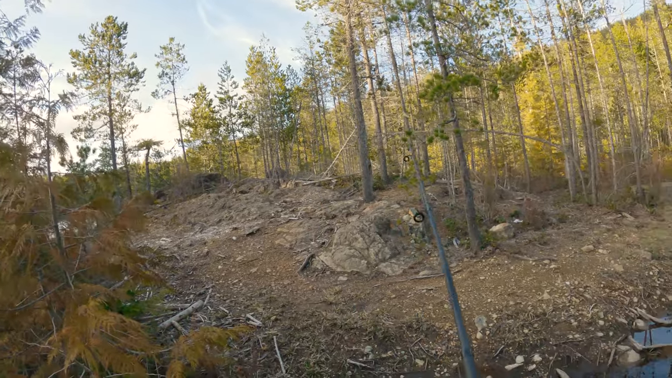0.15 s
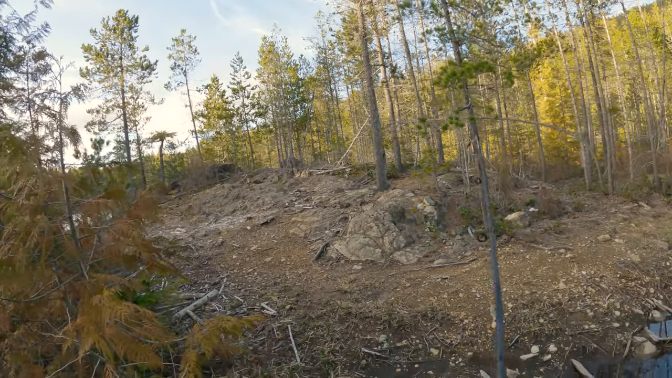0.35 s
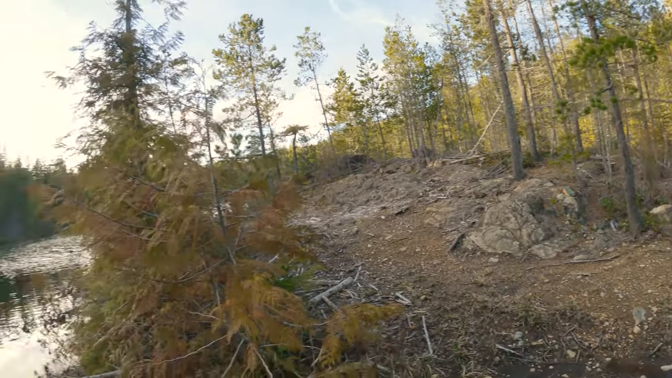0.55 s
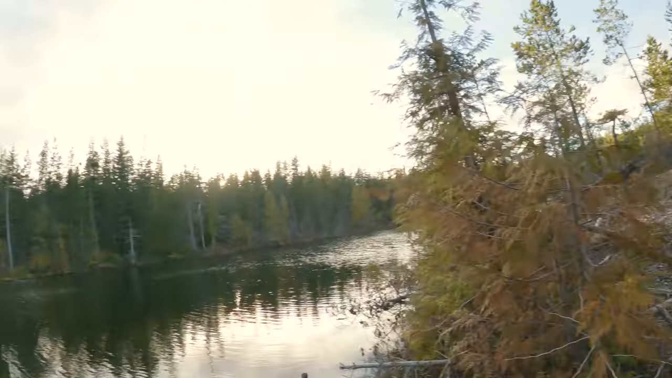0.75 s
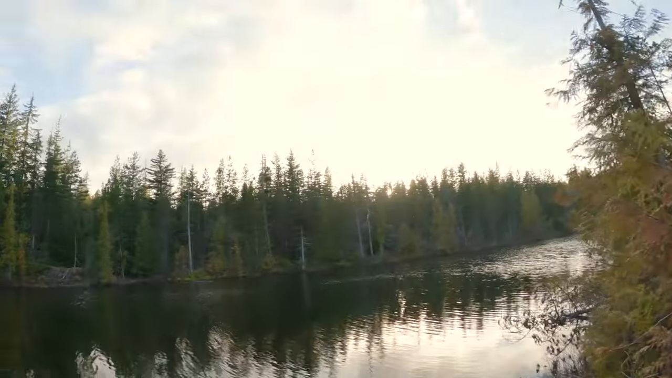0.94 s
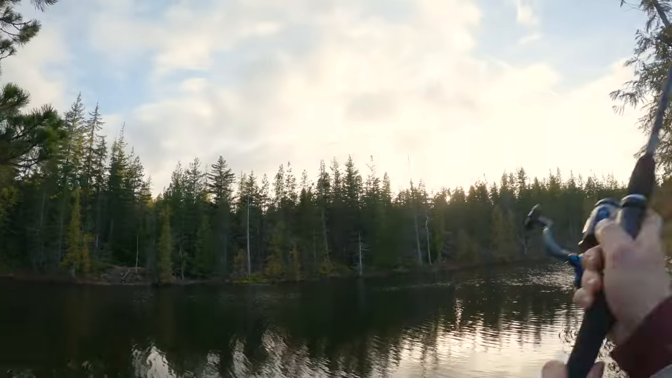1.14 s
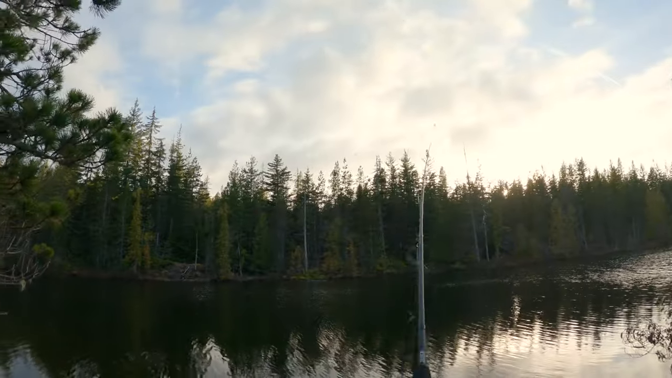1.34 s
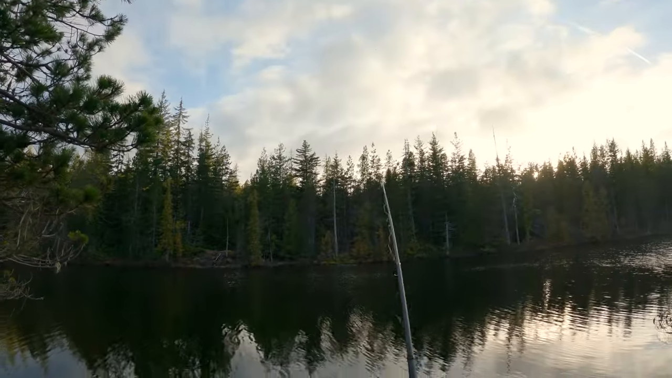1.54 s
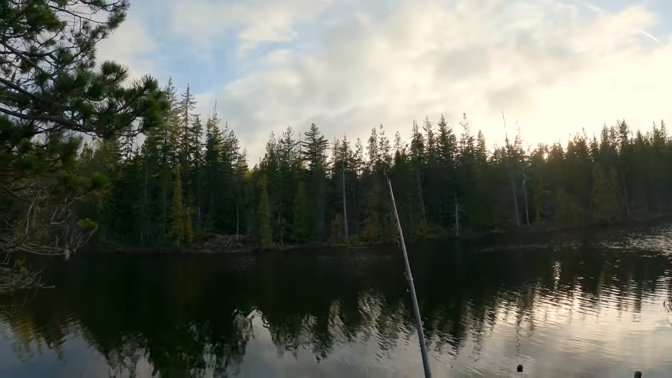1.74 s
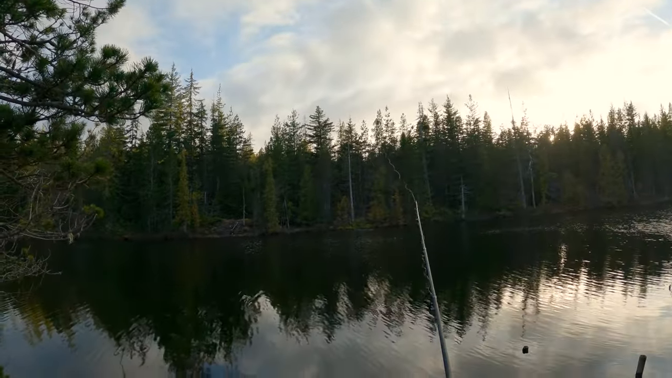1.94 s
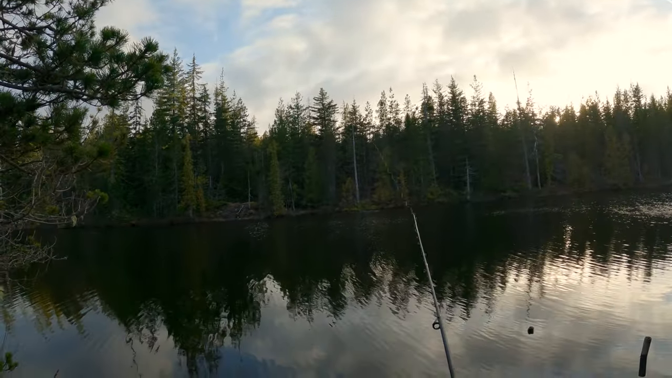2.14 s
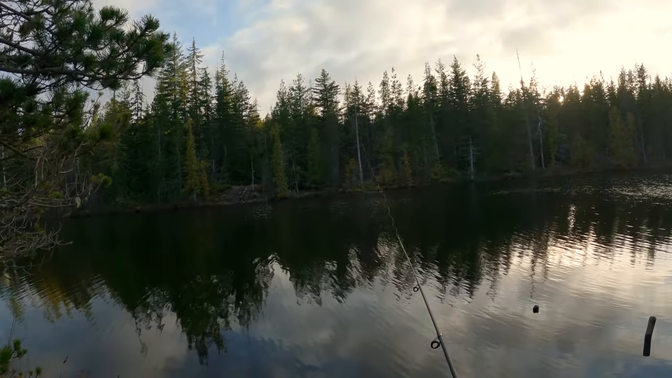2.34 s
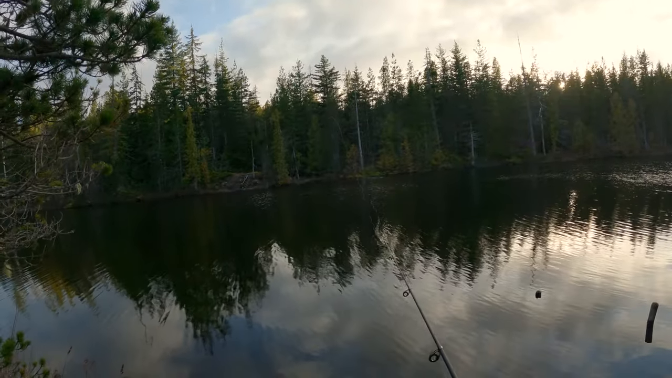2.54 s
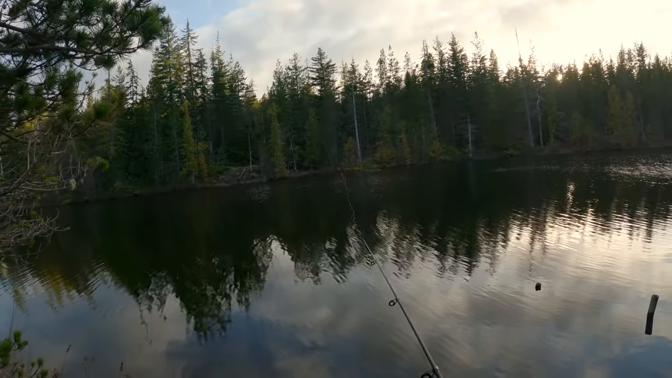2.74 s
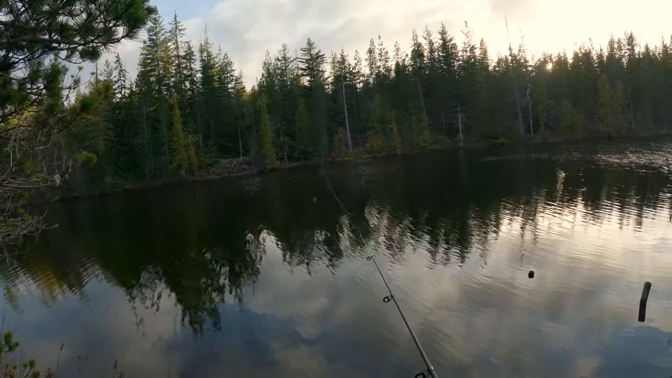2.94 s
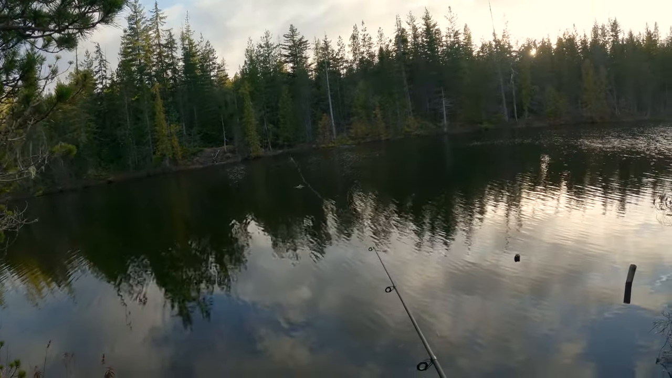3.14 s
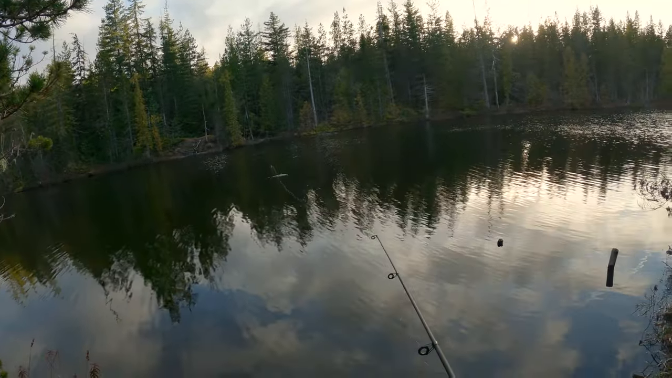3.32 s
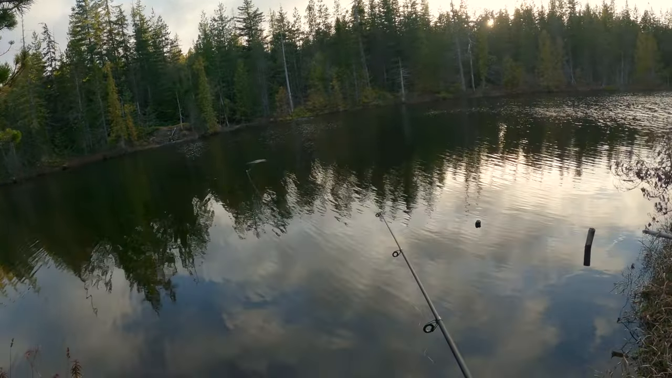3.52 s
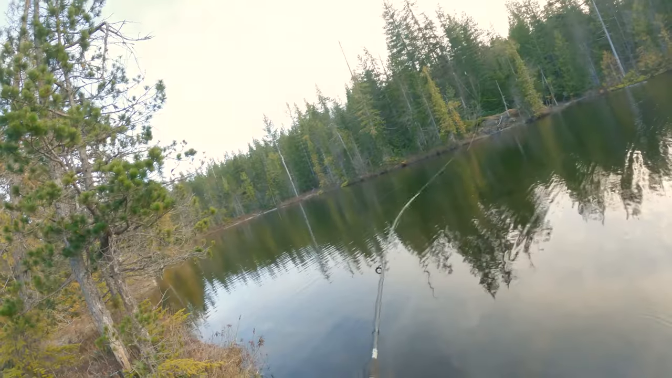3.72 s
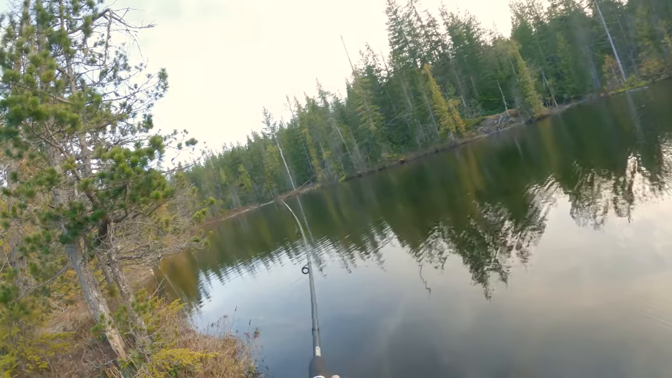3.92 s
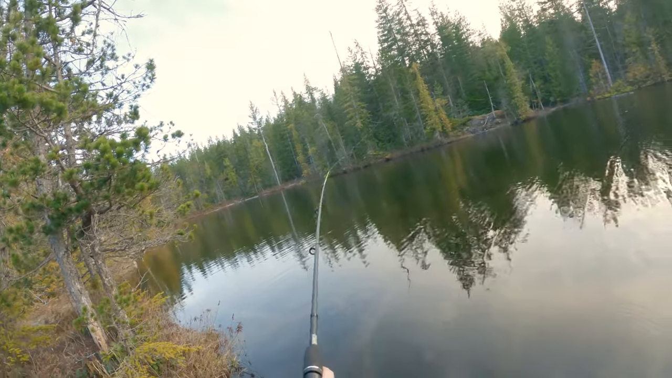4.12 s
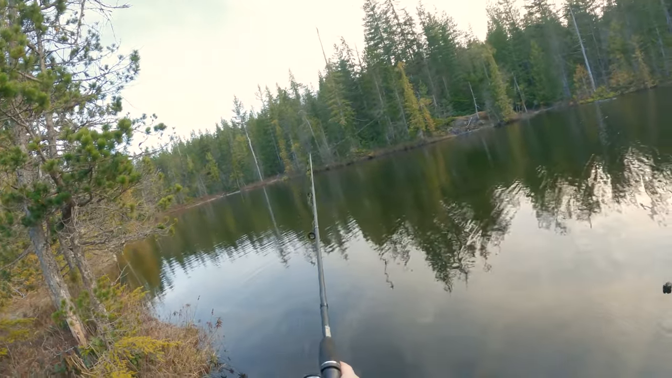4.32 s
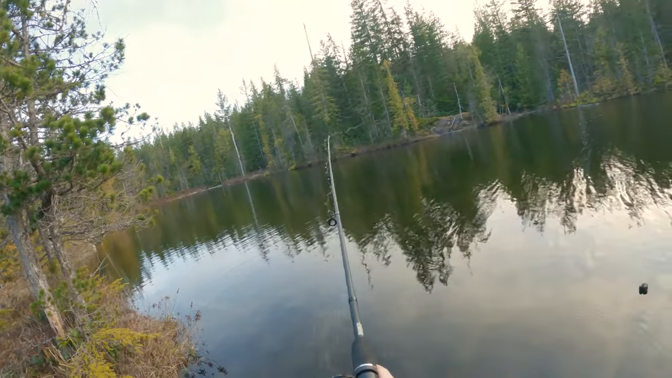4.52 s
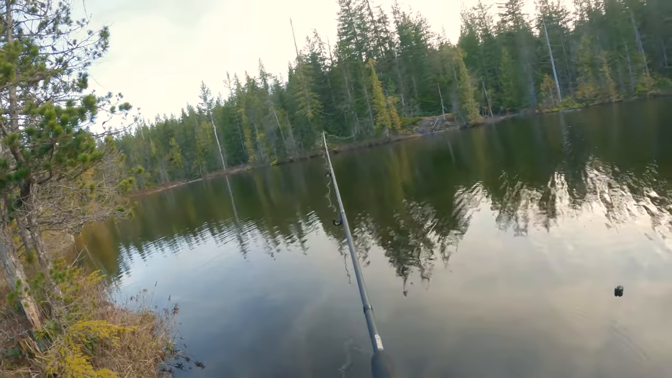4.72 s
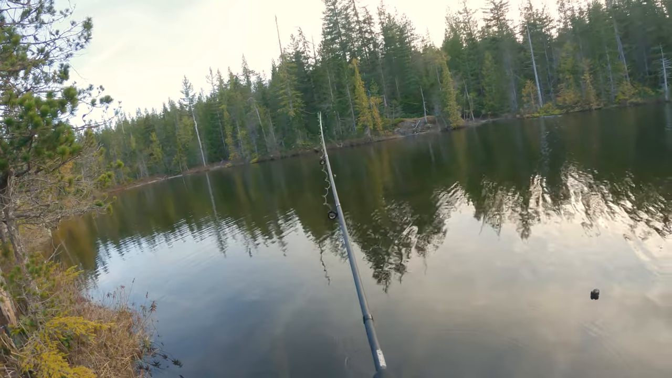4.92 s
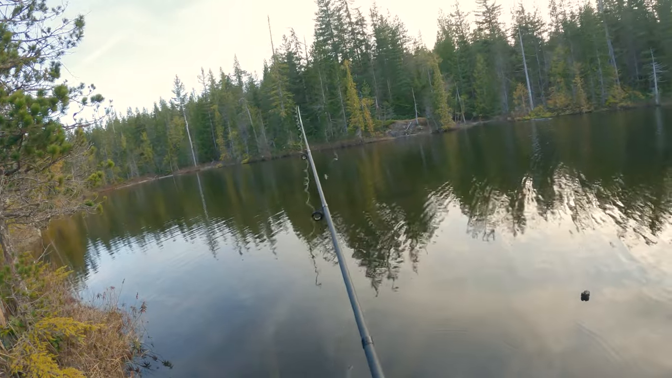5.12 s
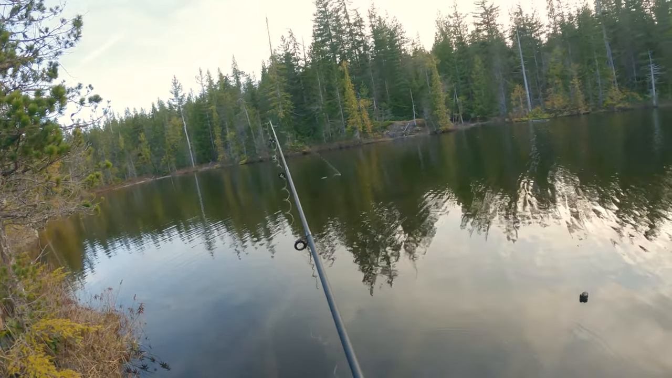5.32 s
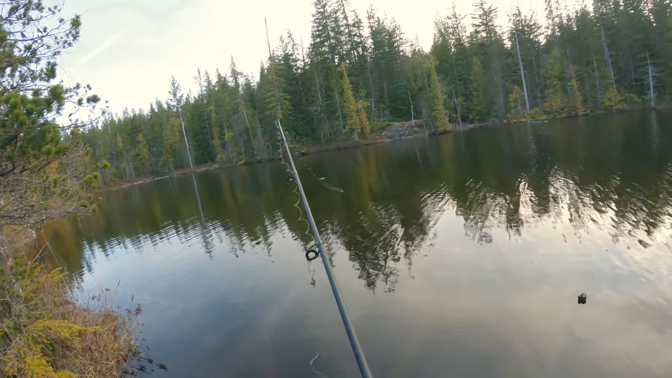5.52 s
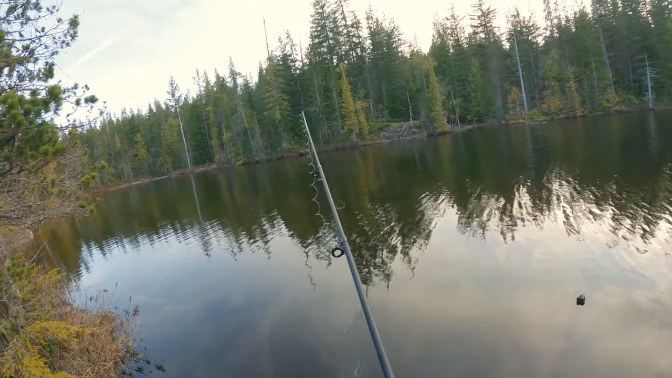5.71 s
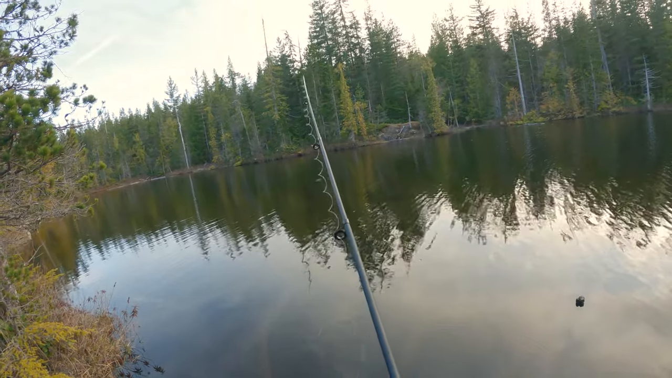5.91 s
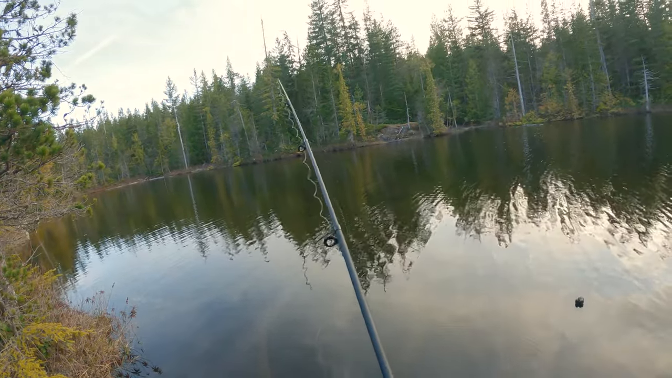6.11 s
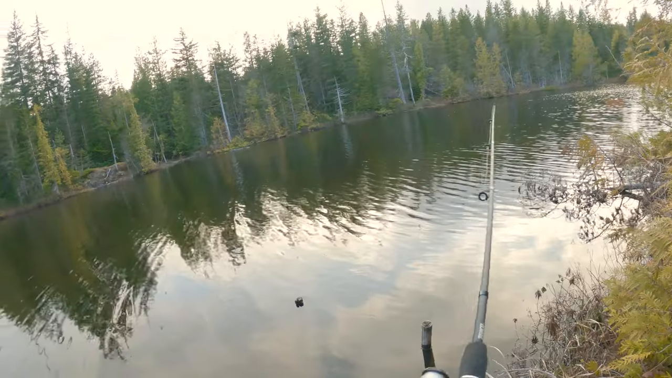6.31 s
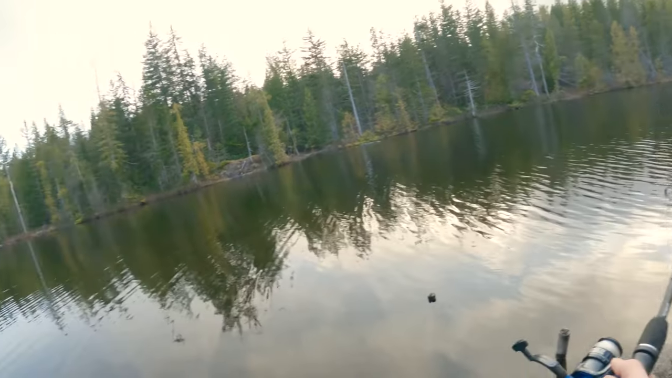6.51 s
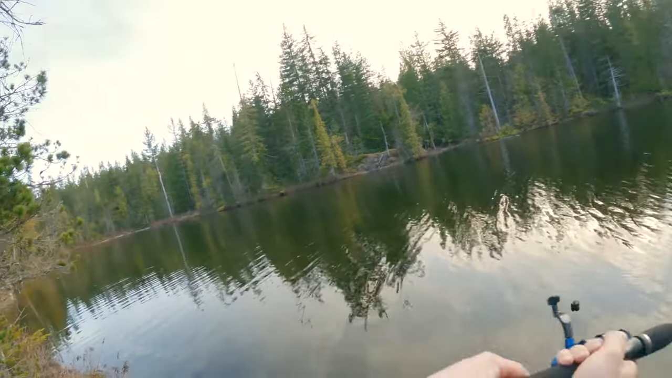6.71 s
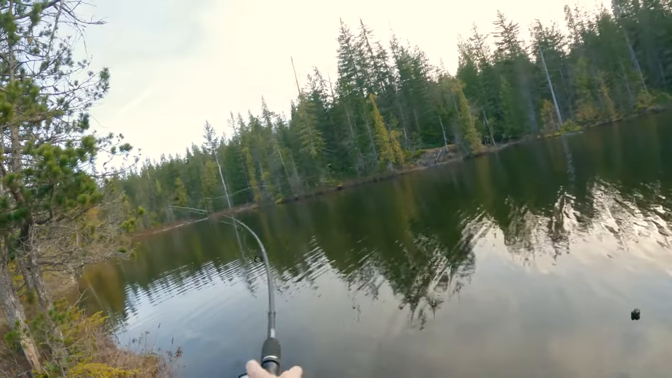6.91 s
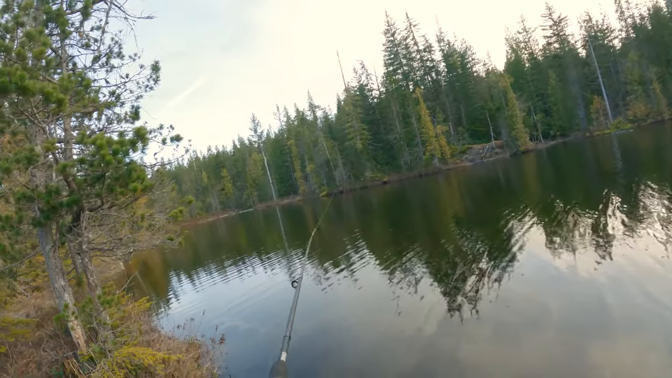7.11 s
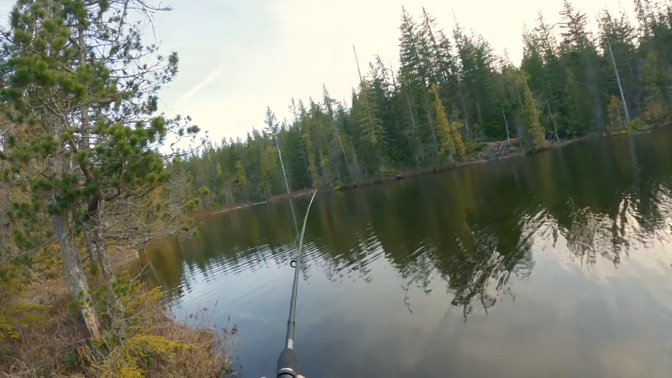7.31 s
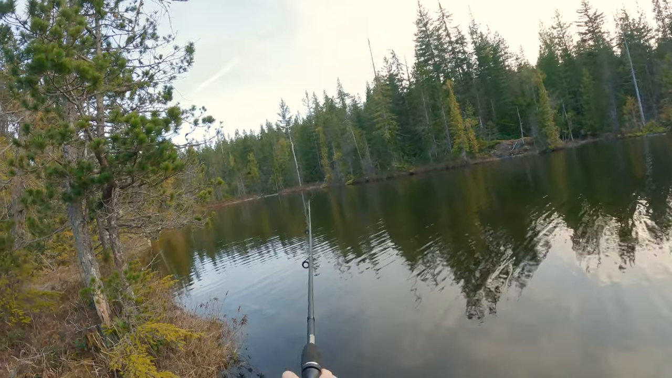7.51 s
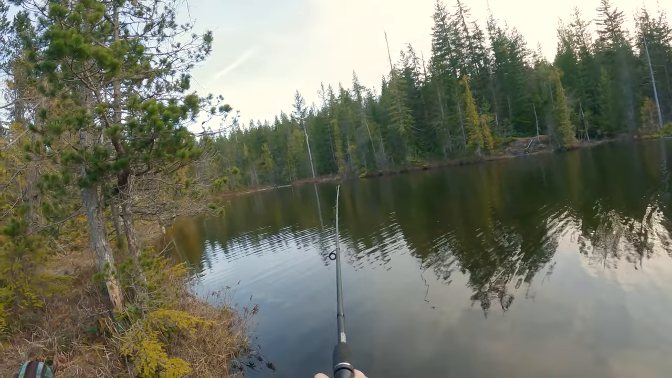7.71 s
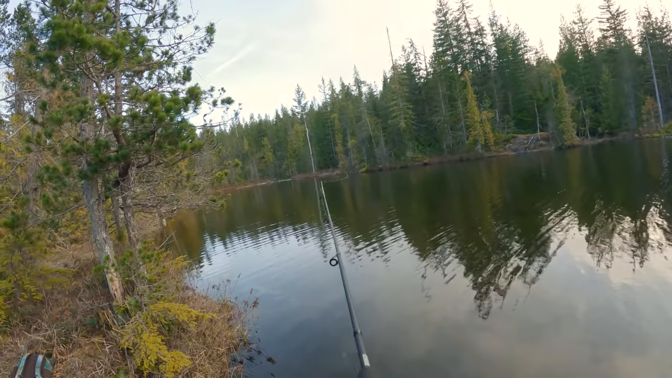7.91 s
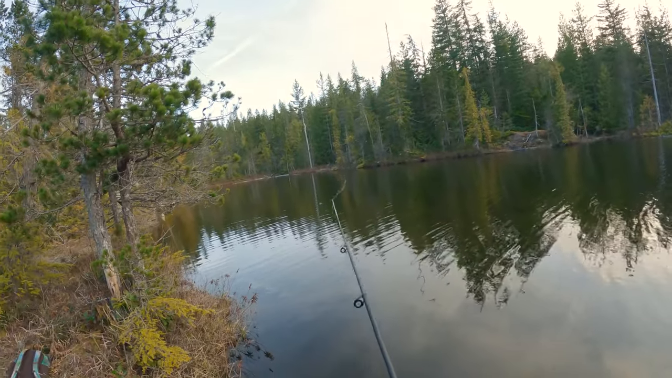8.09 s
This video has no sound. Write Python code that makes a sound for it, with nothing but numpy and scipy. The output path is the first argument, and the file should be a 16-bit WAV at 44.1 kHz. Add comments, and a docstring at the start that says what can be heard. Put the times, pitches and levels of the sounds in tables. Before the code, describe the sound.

Three light fishing rod casts on a quiet lakeshore: airy whips, zipping line, dry snaps, hollow grip knocks and sharp metallic reel clicks.

```python
"""Still air on a lakeshore, then a line snap, slipping grip and the first of three casts with a light rod. Air,
swing and sleeve are shaped patchy noise; line grains ring the rod's guides; whips hiss at a moving pitch.
Knocks sink in pitch; reel contacts and a few line snaps excite body and wire-arm modes; other line snaps are
damped clicks. Heard close up and body-worn, dull above 7 kHz; an edit cuts to near silence, then fades in
between casts 1 and 2."""
import sys
import numpy as np
from scipy import signal
from scipy.fft import rfft, irfft, next_fast_len
from scipy.io import wavfile
from scipy.ndimage import uniform_filter1d, map_coordinates

SR = 44100
rng = np.random.default_rng(int(sys.argv[2]) if len(sys.argv) > 2 else 0)


def bounce(signal):
    """Save signal as a 16-bit WAV file at the path given by the first command-line argument."""
    frames = np.transpose(np.atleast_2d(signal))
    limited = np.clip(frames, -1, 1)
    pcm = np.round(limited * 32767).astype(np.int16)
    wavfile.write(sys.argv[1], SR, pcm)


def rack_gain(trim_db):
    """Turn a fader trim in dB into the linear factor to multiply a signal by."""
    fader = np.asarray(trim_db, float)
    return 10 ** (fader / 20)


N = 359415

# Modes of the reel body. Each row: frequency in Hz, relative level in dB, t60 in seconds.
BODY_MODES = [(1100, -9, .02), (1261, -8.5, 0.02), (1640, -1.5, 0.0135), (1970, -3, 0.004),
              (2130, -3.5, 0.0128), (2950, 3, 0.014), (3300, -2.5, 0.015)]


def unit(x):
    """Scales to rms 1."""
    return x / np.sqrt(np.mean(x ** 2) + 1e-20)


def along(points, hz):
    """Interpolates (Hz, value) points on a log frequency axis."""
    f, v = np.transpose(points)
    return np.interp(np.log(hz + 1), np.log(f + 1), v)


def curves(rows, t=np.arange(N) / SR):
    """Interpolates each column after the first over time in seconds."""
    s, *cols = np.transpose(rows)
    return [np.interp(t, s, c) for c in cols]


def filtered(x, response):
    """Applies a complex response of frequency in Hz."""
    m = next_fast_len(N + SR // 2)
    return irfft(rfft(x, m) * response(np.fft.rfftfreq(m, 1 / SR)), m)[..., :N]


def patchy(depth_db, shape=lambda hz, t: 1):
    """Noise with patches of random gain, shaped over frequency and time."""
    hz, t, z = signal.stft(rng.standard_normal(N), SR, nperseg=256)
    field = uniform_filter1d(rng.standard_normal(z.shape), size=3, axis=0)
    field = uniform_filter1d(field, size=8, axis=1)
    z = z * rack_gain(depth_db * unit(field)) * shape(hz[:, None], t)
    return signal.istft(z, SR, nperseg=256)[1][:N]


def wobble(rate):
    """Random curve, straight between knots, rate knots a second."""
    knots = rng.standard_normal(int(N * rate / SR) + 4)
    return map_coordinates(knots, [np.arange(N) * rate / SR], order=1)


def swells(rows, rest_db):
    """Gain over time: swells rise, hold and fall, adding in power to a resting level."""
    t = np.arange(N) / SR
    power = rack_gain(rest_db) ** 2
    for s, db, rise, hold, fall in rows:
        away = np.maximum((s - t) / rise, (t - s - hold) / fall)
        power = power + rack_gain(db - 20 * np.maximum(away, 0)) ** 2
    return np.sqrt(power)


def add(track, s, sound):
    """Mixes a sound in at s seconds."""
    start = round(s * SR)
    track[start:start + len(sound)] += sound[:len(track) - start]


def air():
    """Still air of the lake: steady patchy noise with a fixed spectrum."""
    # Each row: frequency in Hz, relative level in dB per Hz.
    air_spectrum = [(30, -17.5), (70, -25), (115, -20), (155, -11), (300, -8), (550, -1.5), (800, -6),
                    (1100, -1.5), (1800, -4.5), (2600, -14.5), (4500, -27.5), (8000, -32.5), (12000, -41)]
    return rack_gain(-53.0) * unit(filtered(patchy(2.0), lambda hz: rack_gain(along(air_spectrum, hz))))


def swing():
    """Air pushed by arm and rod butt: a low rush swelling over a drifting breeze level."""
    # Each row: peak in seconds, level in dB, seconds to rise 20 dB, hold in seconds, seconds to fall 20 dB.
    swing_rows = [(1.3, -38.5, 0.142, .01, 0.188), (1.45, -48, .6, .05, 0.37),
                  (2.25, -50, 0.433, 0.010095, 0.54), (4.05, -49, 0.405, 0.0093, 0.189),
                  (5.24, -59, 0.123, .3, 1), (6.02, -52, 0.181, 0.24, 0.316), (6.9, -45, 0.236, 0.048, 0.7),
                  (6.97, -32, 0.0407, 0.0046, 0.0554), (7.83, -51, 0.222, .01, .15)]
    # Each row: time in seconds, level in dB.
    breeze_rows = [(0, -59.5), (.3, -51), (1.2, -52.5), (1.7, -58.5), (3.0, -51.5), (3.6, -52.5),
                   (4.2, -70), (6.4, -60.5), (7.3, -56), (7.7, -64.5)]
    # Each row: frequency in Hz, relative level in dB per Hz.
    rush_spectrum = [(30, -11.5), (150, -6), (300, -2), (520, -2), (800, -5), (1500, -15), (3000, -41)]
    rush = unit(filtered(patchy(3.4), lambda hz: rack_gain(along(rush_spectrum, hz))))
    return swells(swing_rows, curves(breeze_rows)[0]) * rush


def sleeve():
    """Cloth rubbing: bright patchy noise of unsteady level."""
    # Each row: peak in seconds, level in dB, seconds to rise 20 dB, hold in seconds, seconds to fall 20 dB.
    rub_rows = [(.81, -51, 0.098, .02, .08), (1.3, -41, 0.041, 0.072, 0.18),
                (1.49, -47.5, .1, 0.193, 0.248), (2.39, -56.5, 0.234, 0.0094, 0.073),
                (2.8, -62.5, 0.45, 0.465, 0.57), (3.93, -55.5, 0.28, .01, .13), (4.07, -51, .09, .01, .14),
                (6.08, -59, .25, 0.045, .2), (6.9, -52, 0.13, .02, .2), (6.97, -40.5, 0.068, .03, .1),
                (7.3, -49, .1, .01, 0.27), (7.45, -60, .5, 0.095, 0.17), (8.04, -62, 0.36, .01, .08)]
    # Each row: frequency in Hz, relative level in dB per Hz.
    cloth_spectrum = [(2000, -26.5), (3500, -12.5), (5000, -0.5), (6500, 2.5), (9000, 4.5), (13000, 1)]
    cloth = unit(filtered(patchy(3.1), lambda hz: rack_gain(along(cloth_spectrum, hz))))
    return swells(rub_rows, -84.5) * rack_gain(2.8 * wobble(22)) * cloth


def guides(slaps):
    """Guide rings drift between a slack and a taut tuning and come in uneven bursts."""
    # Each row: centre in Hz before detuning, width in Hz, relative level in dB.
    ring_modes = [(1420, 260, -8), (2100, 240, -10), (2450, 200, -10), (2900, 200, -5), (4000, 170, 1.5),
                  (5140, 130, 0), (5890, 260, -12)]
    detune, flutter_db = .018, 3.5  # share each way; swell as the line's pull changes

    def rings(scale):
        def response(f):
            total = .012 * f / (f + 1500)
            for k, (c, w, db) in enumerate(ring_modes):
                total = total + (-1) ** k * rack_gain(db) * 1j * f * w / ((c * scale) ** 2 - f * f + 1j * f * w)
            return total
        return response

    turn = np.pi / 4 * (1 + np.tanh(wobble(14)))
    slack = filtered(slaps, rings(1 - detune))
    taut = filtered(slaps[::-1], rings(1 + detune))
    ring = np.cos(turn) * slack + np.sin(turn) * taut
    return unit(ring * rack_gain(flutter_db * wobble(60)))


def line():
    """Line slaps the guides in grains: a taut line rings them, a slack one only hisses."""
    # Each row: peak in seconds, level in dB, seconds to rise 20 dB, hold in seconds, seconds to fall 20 dB.
    # Negative times swap the roles of rise and fall.
    run_rows = [(.83, -52.5, -0.0041, 0.0103, -0.13), (1.08, -56, .5, 0.049, 0.04),
                (1.35, -28, 0.1679, 0.0216, 0.0532), (1.5, -36.5, 0.1265, 0.105, 0.3323),
                (1.8, -59.5, 0.45, 0.326, 1.34), (2.3, -55, 0.6, 0.027, 0.3847),
                (3.1, -61, 0.68, .05, 1.42), (3.92, -40.5, 0.1688, 0.1347, 0.0547),
                (4.33, -47.5, 0.4557, 0.0495, 0.37), (5.2, -60, 0.68, 0.139, 0.48),
                (5.7, -51.5, 0.31, .01, 0.03), (6.1, -58, 0.09, 0.154, 0.08), (7.0, -38.5, .3, 0.0522, 0.1),
                (7.16, -41, 0.1435, .06, .42), (7.46, -55, 0.07, .14, 0.18),
                (8.04, -55.5, 0.62, 0.0091, 0.05)]
    # How freely the guides ring. Each row: time in seconds, share 0-1.
    ringing_rows = [(1.25, 0.52), (1.42, 0.93), (1.75, 0.89), (2.5, 0.58), (3.8, 0.41), (3.92, 0.86),
                    (4.15, 0.66), (6.8, .45), (7.1, .65), (7.3, .75), (7.7, 0.54)]
    grain_gain = rack_gain(14.0 + 3.9 * np.minimum(rng.exponential(size=N), 2.4))
    grains = (rng.random(N) < 160 / SR) * grain_gain  # 160 a second on average
    slaps = rng.standard_normal(N) * (.5 + grains)
    damped = lambda f: 1j * f * 4500 / (3000 ** 2 - f * f + 1j * f * 4500)
    hiss = unit(filtered(rng.standard_normal(N), damped))
    share = np.clip(curves(ringing_rows)[0], 0, 1)
    return swells(run_rows, -75) * (share * guides(slaps) + np.sqrt(1 - share ** 2) * hiss)


def rung(modes, contact_ms, favoured_hz=None):
    """Modes driven by a short scrape of contact; peak 1."""
    hz, level, t60 = np.transpose(modes)[..., None]
    t = np.arange(SR // 30) / SR
    u = t / max(contact_ms / 1000, 5e-5)
    scrape = rng.standard_normal((len(modes), len(t))) * u * np.exp(-u)
    decays = rack_gain(-60 * t / t60) * (1 - np.exp(-.7 * hz * t)) * np.sin(2 * np.pi * hz * t)
    rings = signal.fftconvolve(decays, scrape, axes=1)[:, :len(t)]
    if favoured_hz:
        level = level - np.minimum(220 * np.log2(hz / favoured_hz) ** 2, 27)
    sound = np.sum(rack_gain(level) * rings / np.abs(rings).max(axis=1, keepdims=True), axis=0)
    return sound / np.abs(sound).max()


def tick(favoured_hz, body_db, wire_db, contact_ms):
    """Body rings most near its favoured pitch, the wire arm jingles above, the contact itself snaps."""
    # Each row: frequency in Hz, relative level in dB, t60 in seconds.
    wire_modes = [(3695, -5, .008), (4373, -2.5, 0.0061), (5056, -3.5, 0.011), (5638, -10, 0.018),
                  (6616, -10, .008), (7532, -8.5, 0.0078), (11220, -22, .005)]
    t = np.arange(SR // 30) / SR
    u = t / (.0003 + contact_ms / 1000)
    snap = rack_gain(wire_db - 13.5) * rng.standard_normal(len(t)) * u * np.exp(1 - u)
    body = rack_gain(body_db) * rung(BODY_MODES, contact_ms, favoured_hz)
    return body + rack_gain(wire_db) * rung(wire_modes, contact_ms) + snap


def fidgets():
    """Fingers on the reel set off faint ticks at chance times, pitches and sizes."""
    # Each row: start in seconds, end in seconds, ticks a second, top body level in dB.
    fidget_rows = [(1.849, 2.45, 16.1, -47.5), (2.78, 3.301, 15.4, -46), (4.798, 5.101, 10, -48),
                   (5.143, 5.421, 60, -49), (7.25, 7.8, 15.4, -45)]
    rows = []
    for start, end, rate, db in fidget_rows:
        for at, pitch, body, wire in rng.random((round(rate * (end - start)), 4)):
            s = start + at * (end - start)
            rows.append((s, 1500 * 2.4 ** pitch, db - 9 * body, db - 1.5 - 16 * wire, 2.5))
    return rows


def chatter(count=5):
    """The shut wire arm bounces on, ever weaker and further apart."""
    first_s, gap_s, gap_growth = 5.661, .0095, 1.32
    rows = []
    for k in range(count):
        s = first_s + gap_s * (gap_growth ** k - 1) / (gap_growth - 1)
        body_db = -21.5 - 5 * k
        rows.append((s, 1840, body_db, body_db - 2.5, 1.8))
    return rows


def reel():
    """Contacts ring body and wire arm: single ticks, chatter, fidgets, a short uneven run of gear teeth. Three
    quick line snaps near 1.55-1.62 s ring the same body and wire-arm modes."""
    # Each row: start in seconds, favoured body pitch in Hz, body level in dB, wire level in dB, contact in ms.
    # # The rows at 1.545, 1.581 and 1.6219 s are line snaps sounding through the same modes.
    tick_rows = [(0.961, 1900, -31, -51, 3), (1.36, 1100, -24, -31, 0.73), (1.545, 2950, -29, -36.5, 0.44),
                 (1.581, 2910, -28.5, -38, 0.43), (1.6219, 2950, -39, -28, 0.41),
                 (3.0767, 1386, -36, -33, 2.23), (3.09, 3600, -27.5, -36.5, 0.585),
                 (3.2253, 3230, -31.5, -50, 0.315), (3.2569, 2320, -40, -32, 0.96),
                 (3.47, 2950, -38.5, -50.5, 1), (3.4732, 1280, -30.5, -47, 1),
                 (3.5153, 1640, -19.5, -26, 0.5), (3.5168, 1640, -5.5, -21.5, 0.126),
                 (5.102, 3350, -47, -38.5, 0.83), (5.1096, 1420, -41.5, -38, 2.77),
                 (5.122, 1350, -37, -49, 0.76), (5.301, 1300, -47.5, -40.5, 0.35),
                 (5.33, 2970, -42.5, -50.5, 1.08), (5.4353, 2017, -28.5, -31, 1.28),
                 (5.596, 1770, -36.5, -31, 2), (5.633, 1540, -39, -34, 5), (5.6423, 2040, -24.5, -24, 2.1),
                 (5.652, 2080, -8.5, -6.5, 0.269), (5.6542, 2130, -13, -6.5, 1.06),
                 (5.8999, 1684, -24.5, -33.5, 0.485), (6.7816, 1460, -49, -39, 0.64),
                 (6.886, 2200, -42, -33.5, 0.62), (6.94, 2220, -41.5, -24.5, 0.84),
                 (6.969, 1970, -24.5, -24.5, 0.89), (7.4644, 2986, -40.5, -34.5, 0.91)]
    # Each row: time in seconds, level in dB, teeth a second.
    gear_rows = [(6.162, -32, 98), (6.2, -37, 90), (6.25, -37, 82), (6.31, -39.5, 84)]
    track = np.zeros(N)
    for s, *contact in tick_rows + chatter() + fidgets():
        add(track, s, tick(*contact))
    gear_db, rate = curves(gear_rows)
    t = np.arange(N) / SR
    turning = (t > gear_rows[0][0]) & (t < gear_rows[-1][0])
    teeth = np.ceil(np.cumsum(rate * turning) / SR)
    for n in np.flatnonzero(np.diff(teeth) > 0):
        late, size, pitch = rng.standard_normal(size=3)
        tooth = tick(1730 * np.exp(.07 * pitch), -0.61, -9, 0.585)
        tooth = tooth + rack_gain(-11) * rung(BODY_MODES, 1.3, 2850)
        add(track, n / SR + 0.0008 * late, rack_gain(gear_db[n] + 2.21 * size) * tooth)
    return track


def knocks():
    """Grip slips send a bending wave along the rod: the high part arrives first, so the thump falls in pitch."""
    # Each row: time in seconds, level in dB, bright edge re thump in dB, mean pitch the thump sinks to in Hz.
    knock_rows = [(0.5065, -30, -9, 300), (0.745, -32.5, -9.5, 300), (0.789, -34.5, -9.5, 300),
                  (0.831, -32, -20, 300), (0.869, -34, -8.5, 320), (0.907, -32.5, -8, 280),
                  (0.945, -32, -5.5, 280), (0.971, -33, -9, 330), (0.993, -26.5, -9, 339),
                  (0.9985, -28.5, -14.5, 340), (1.012, -24, -6.5, 338), (1.027, -24, -7.5, 328),
                  (1.0521, -23.5, -5, 328), (1.0751, -22, -5, 318), (1.1006, -21, -5.5, 320),
                  (1.138, -21, -5.5, 308), (1.435, -19.5, -8.5, 321), (2.663, -23, -13, 120),
                  (2.7385, -15, -12.5, 110), (3.0515, -17, -9, 140), (3.1735, -15, -9.5, 170),
                  (3.4075, -22, -10, 120), (5.239, -35, -11, 110), (5.323, -35, -11, 120),
                  (5.438, -34.5, -4, 252), (5.654, -22, 7.5, 326), (6.857, -32.5, -7, 300),
                  (6.885, -29.5, -9, 299), (6.925, -26, -3, 280), (6.956, -24.5, -6.5, 241),
                  (6.977, -27, -3.5, 280), (7.15, -19.5, -4, 298), (7.253, -33.5, -13, 260),
                  (7.765, -33, -4.5, 260)]
    # Rod blank. Each row: mean frequency in Hz, mean relative level in dB, t60 in seconds.
    rod_modes = [(1090.6, 1, 0.0146), (1545, 2, 0.01018), (1900, -3, .009), (2788, -3.5, 0.01157),
                 (3600, -6, .008), (5520, -17.5, 0.0097)]
    track, t = np.zeros(N), np.arange(SR // 20) / SR
    for s, db, edge_db, low_hz in knock_rows:
        hz = (low_hz + (800 - low_hz) * np.exp(-t / 0.003616)) * rng.normal(1, 0.045)
        swell = t / 0.003392 * np.exp(.5 - (t / 0.003779) ** 2)
        thump = swell * np.sin(2 * np.pi * np.cumsum(hz) / SR)
        edge = np.zeros(len(t))
        for f, level, t60 in rod_modes:
            decay = rack_gain(level + rng.normal(0, 2.6) - 60 * t / t60)
            edge += decay * np.sin(2 * np.pi * f * rng.normal(1, 0.023) * t)
        edge *= 1 - np.exp(-t / .0004)
        add(track, s - .0005, rack_gain(db) * (thump + rack_gain(edge_db) * edge))
    return track


def snaps():
    """Line snaps dry against the spool lip: one sharp broad click with a brief rattle after it."""
    # Each row: time in seconds, level in dB.
    snap_rows = [(0.473, -19.5), (1.3354, -5), (1.611, -23), (6.971, -13), (7.208, -23.5), (7.27, -26.5)]
    click_hz, width_hz = 3300, 2300
    track, t = np.zeros(N), np.arange(SR // 100) / SR
    click = np.sin(2 * np.pi * click_hz * t) * np.exp(-np.pi * width_hz * t)
    for s, db in snap_rows:
        rattle = .13 * rng.standard_normal(len(t)) * np.exp(-t / .0013)
        add(track, s, rack_gain(db) * (click + np.convolve(rattle, click)[:len(t)]))
    return track


def ground(x):
    """Body, stones and scrub return a short bright smear of every blow."""
    t = np.arange(SR // 10) / SR
    tail = np.diff(rng.standard_normal(len(t)), prepend=0) * rack_gain(-60 * t / 0.083) * (t > .004)
    return x + rack_gain(-8.5) * signal.fftconvolve(x, tail / np.linalg.norm(tail))[:N]


def whips():
    """Vortices shed by the rod tip hiss round a pitch that follows its speed."""
    # One list a cast. Each row: time in seconds, level in dB, vortex pitch in Hz.
    casts = [
        [(1.19, -54, 1213), (1.25, -37.5, 1515), (1.29, -40, 2300), (1.33, -33.5, 3300), (1.355, -28.5, 3932),
         (1.38, -32, 2390), (1.41, -39.5, 1510), (1.45, -48.5, 1310)],
        [(3.9, -52, 2395), (3.94, -35.5, 2360), (4.0, -44, 2482), (4.05, -42, 2500), (4.09, -52.5, 2387),
         (4.14, -67, 1900)],
        [(6.88, -62.5, 2375), (6.93, -37, 2545), (6.96, -39.5, 1911), (6.99, -30.5, 1747), (7.0, -28, 3300),
         (7.02, -33, 3066), (7.06, -39.5, 2198), (7.095, -52, 1900)],
    ]

    def shedding(hz, t):
        octaves = np.log2((hz + 50) / curves(sum(casts, []), t)[1])
        skirt = rack_gain(-6 * octaves ** 2 / (1 + 0.13 * np.abs(octaves)))
        gain = skirt + 0.57 * np.exp(-(octaves / 0.15) ** 2)
        return gain / np.sqrt(np.mean(gain ** 2, axis=0))

    tip = np.zeros(N)
    for rows in casts:
        faded = [(rows[0][0] - .02, -90, 0), *rows, (rows[-1][0] + .02, -90, 0)]
        tip += rack_gain(curves(faded)[0])
    return tip * unit(patchy(4, shedding) * rack_gain(3.0 * wobble(400)))


def scene():
    """All sources sit in the middle; only the blows get the ground's smear."""
    background = air() + swing() + sleeve() + line()
    blows = ground(knocks() + reel() + snaps())
    mono = background + blows + whips()
    return np.array([mono, mono])


def low_pass(x):
    """Removes everything above the highest recorded frequency."""
    return signal.sosfilt(signal.butter(12, 14710, fs=SR, output="sos"), x)


def record(dry):
    """Soft limiting; dull above 7 kHz, gap at 9 kHz, weak top band; side strongest in top treble; an edit gap."""
    # Overall response. Each row: frequency in Hz, gain in dB.
    overall_response = [(40, -20), (110, -16.5), (160, 1), (6500, -1), (8000, -9), (8600, -12.5),
                        (9000, -40), (9500, -20.5), (12000, -20), (13500, -23.5), (14500, -39)]
    # Each row: frequency in Hz, side re mid in dB.
    side_width = [(60, -14.5), (200, -40.5), (1250, -51), (4200, -46), (7700, -25.5), (9500, -14.5),
                  (14000, -1)]
    # Cut to near silence, then a fade in. Each row: time in seconds, gain in dB.
    edit_gap_rows = [(3.66, -0.5), (3.668, -41), (3.71, -60.5), (3.82, -58.5), (3.85, -28.5), (3.87, -8.5),
                     (3.91, 3)]
    pressed = np.tanh(dry[0])  # input stage rounds off the loudest blow
    mid = filtered(pressed, lambda hz: rack_gain(along(overall_response, hz))) * rack_gain(curves(edit_gap_rows)[0])
    turns = np.exp(1j * np.arange(N) / 30)  # phase turning fast with frequency makes side unlike mid
    side_gain = rack_gain(along(side_width, np.fft.rfftfreq(N, 1 / SR)))
    side = irfft(rfft(mid) * side_gain * turns[:N // 2 + 1], N)
    return low_pass(np.array([mid + side, mid - side]))


dry = scene()
out = record(dry)
bounce(out)
```